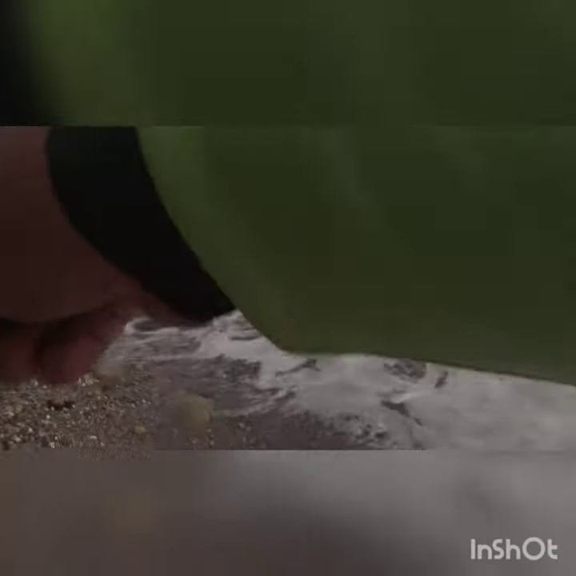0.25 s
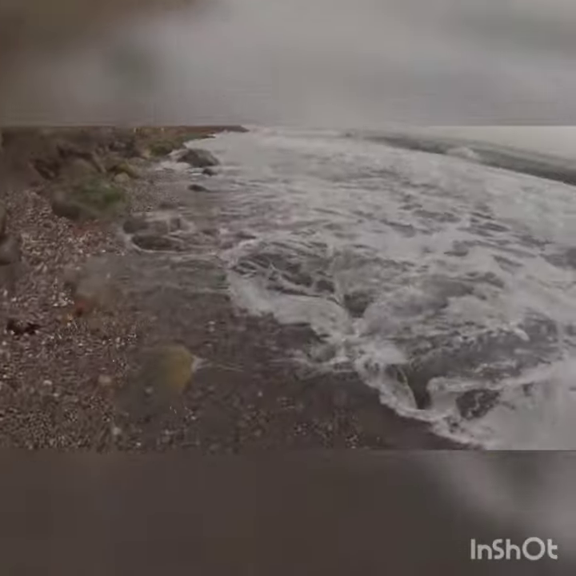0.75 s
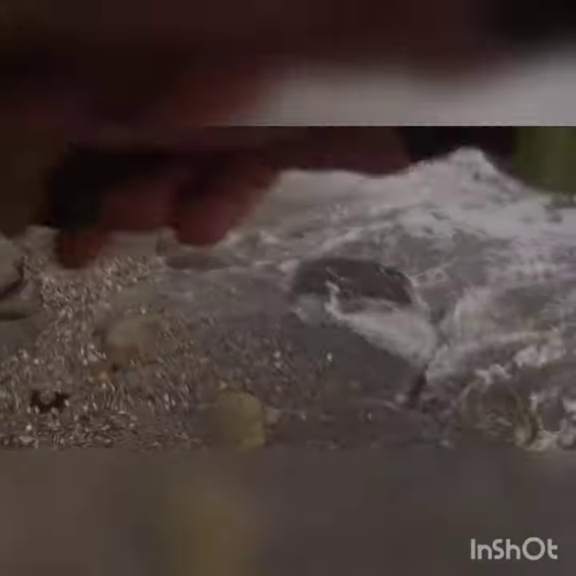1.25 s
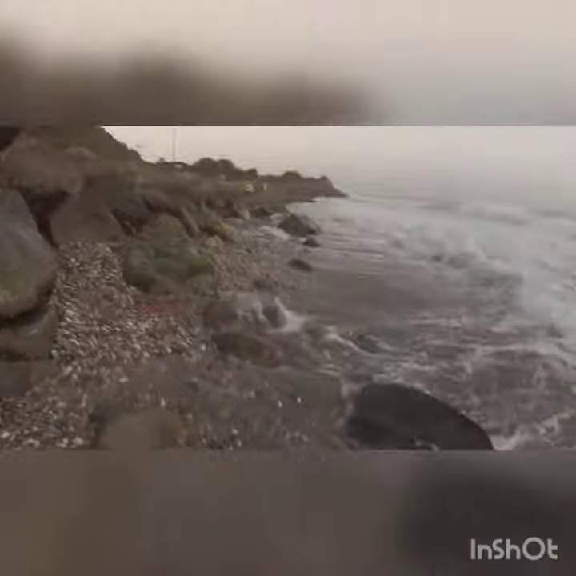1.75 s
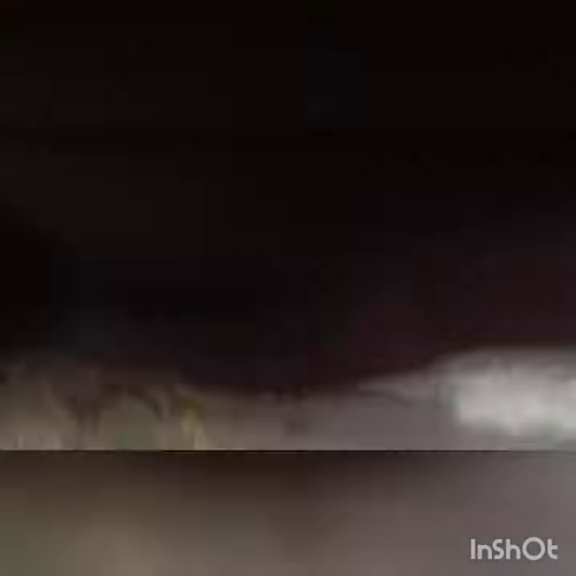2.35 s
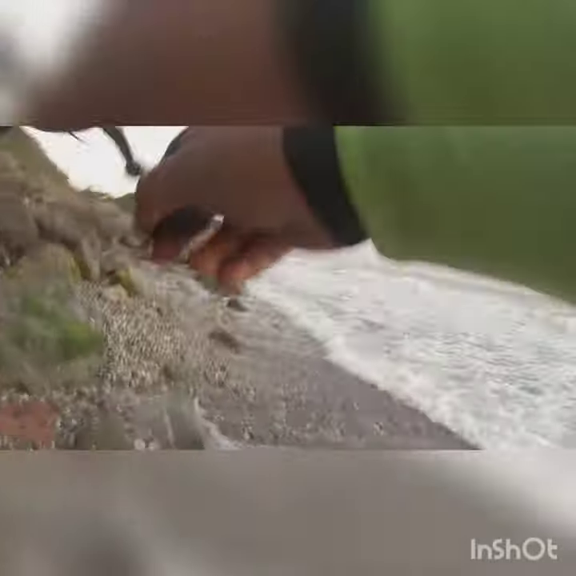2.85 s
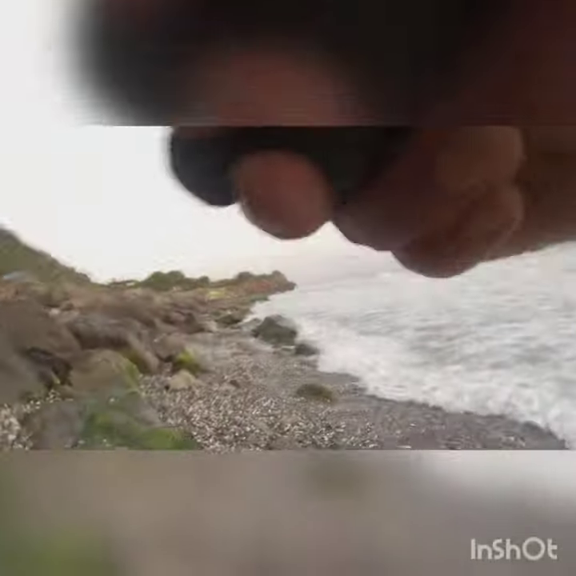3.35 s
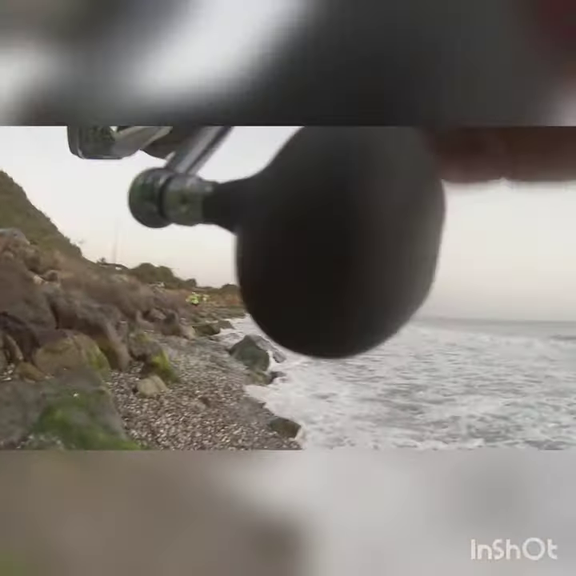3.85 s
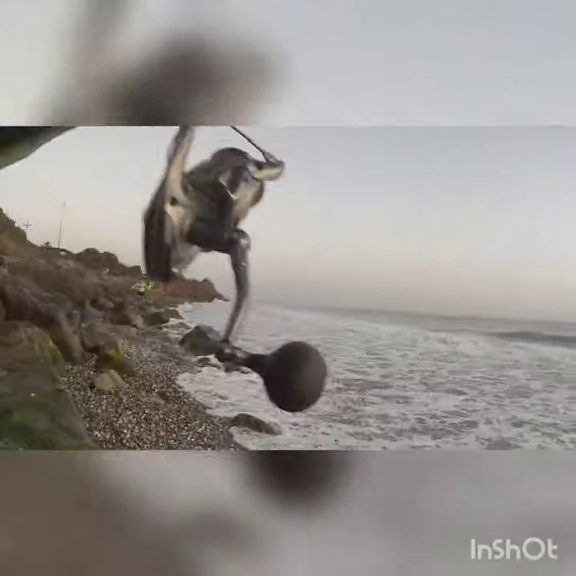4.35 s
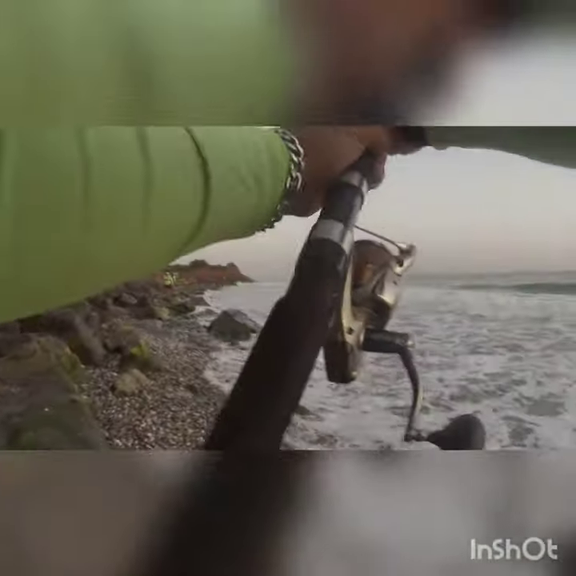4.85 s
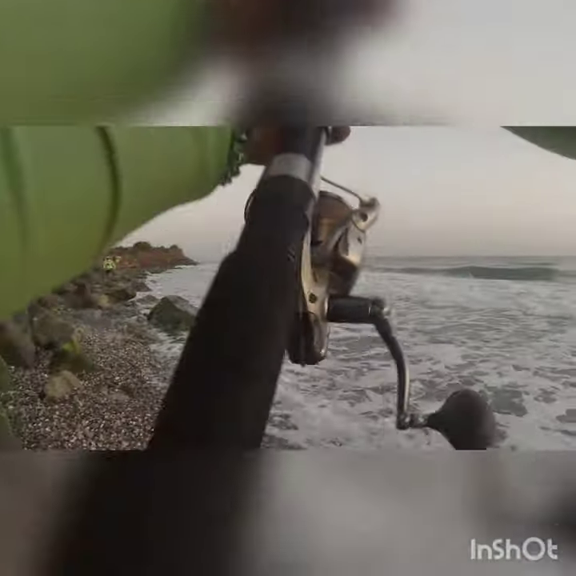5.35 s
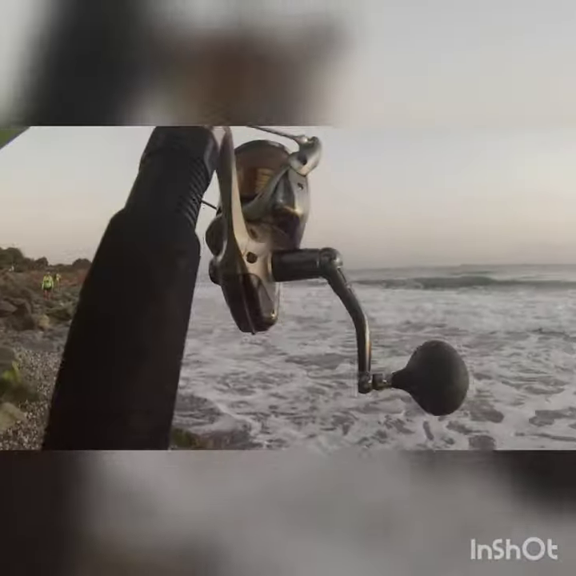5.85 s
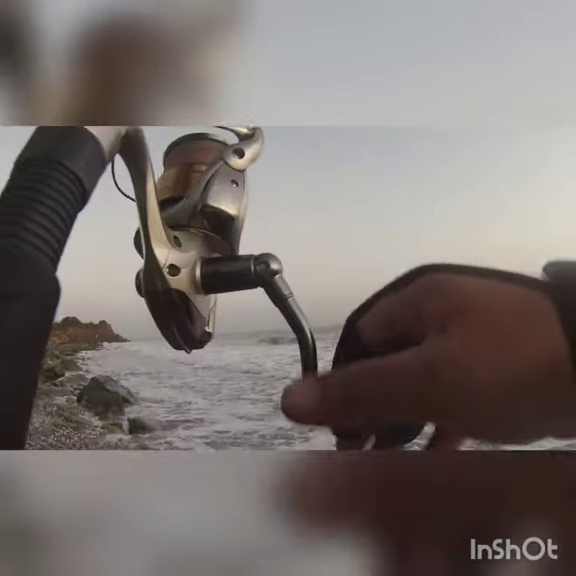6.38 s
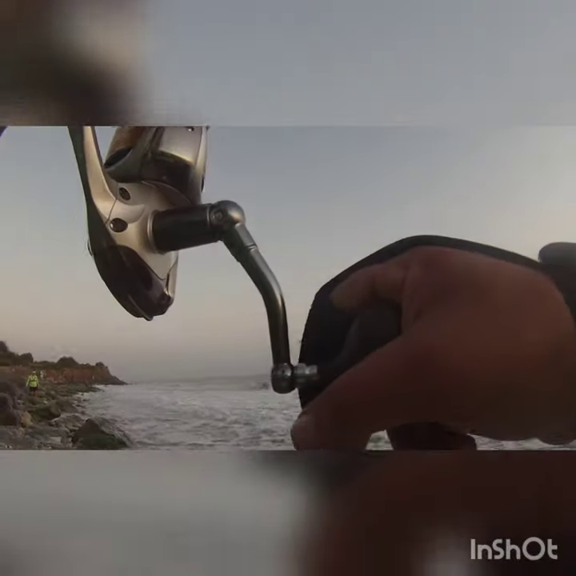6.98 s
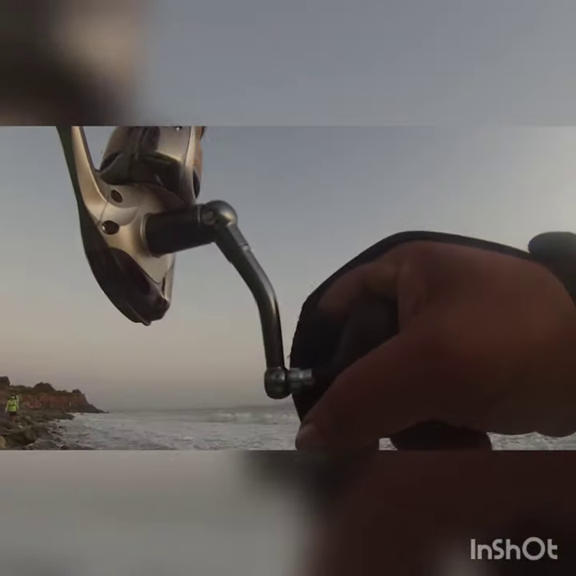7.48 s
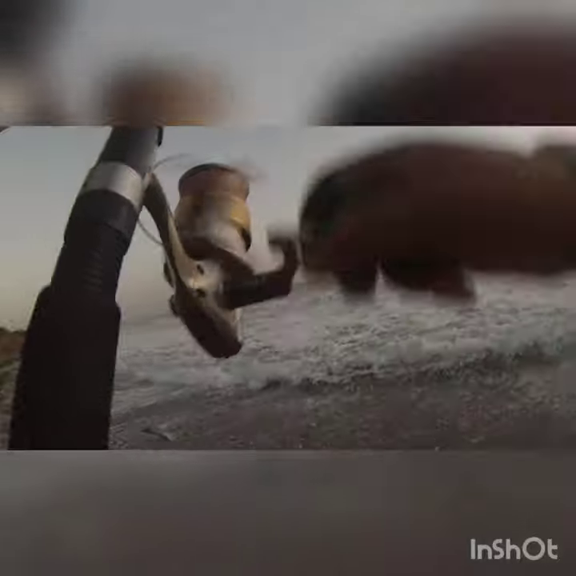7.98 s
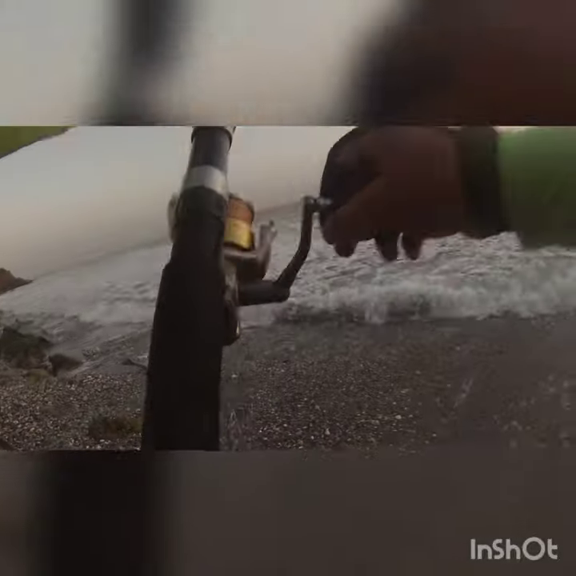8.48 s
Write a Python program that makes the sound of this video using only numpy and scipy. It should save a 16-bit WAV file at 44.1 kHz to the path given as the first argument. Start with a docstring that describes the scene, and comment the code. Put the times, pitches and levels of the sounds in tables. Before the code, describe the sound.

Close, hissing sea waves rush over shingle and recede while a worn camera is brushed, knocked sharply once, and lightly clicked by fishing tackle.

```python
"""Surf washes up a pebble beach and drains back through shingle, as filtered noise and grains driven by one surge.
A camera worn by an angler is brushed and bumped: noise strokes and damped modes. At 2.35 s the rod knocks its case
hard, as modes and a noise crack; the gain ducks and creeps back. Tackle ticks, as short rings, from 3.76 s.
From 6.3 to 8.05 s a hand's echo combs the sea, which surges most at 8.3 s. Wind rumbles throughout, as low noise."""
import sys
import numpy as np
from scipy import signal
from scipy.fft import rfft, irfft, next_fast_len
from scipy.io import wavfile
from scipy.ndimage import uniform_filter1d, map_coordinates

SR = 44100
rng = np.random.default_rng(int(sys.argv[2]) if len(sys.argv) > 2 else 0)


def bounce(signal):
    """Save signal as a 16-bit WAV file at the path given by the first command-line argument."""
    frames = np.transpose(np.atleast_2d(signal))
    limited = np.clip(frames, -1, 1)
    pcm = np.round(limited * 32767).astype(np.int16)
    wavfile.write(sys.argv[1], SR, pcm)


N = 384552  # samples, 8.72 s
TOP_HZ = 15300  # band limit of the camera

# modes of the reel's metal parts: pitch_hz, level_db, t60_s
REEL_MODES = [(1480, -16, .012), (2510, -5, 0.041), (3330, 4, 0.0099), (4740, -5, 0.019),
              (5460, -1, 0.0079), (6800, -11, 0.0055), (9750, -23, 0.0037)]


def surf():
    """Stochastic sources under one envelope: each band of the sea grows at its own rate with the surge."""
    # how hard the water runs up the shore, over the lull between waves: time_s, surge_db
    surge_points = [(0, 4.5), (0.22, 5), (0.55, 2), (1.1, 4.4), (1.3, 8), (1.7, 4), (2.28, 9.5),
                    (3.25, 4.5), (3.55, 3), (4.3, 1.7), (4.75, 0.1), (5.0, 3.5), (5.25, -0.8), (5.6, 2.4),
                    (6.3, 1.0), (7.2, 1.6), (8.3, 11), (8.72, 9)]
    # spectra of the four voices: frequency_hz, density_db (per Hz)
    roar_spectrum = [(50, -7), (120, -0.5), (200, 0), (330, 2), (480, -1.5), (700, -7), (1100, -11),
                     (2500, -33)]
    wash_spectrum = [(350, -43), (700, -12.5), (1050, -3.5), (1500, 2), (1900, 2), (2600, -3.5),
                     (4500, -34), (10000, -50)]
    shingle_spectrum = [(900, -7), (1700, -3), (2400, -3.5), (3200, -1.5), (4100, -3.5), (5500, -12),
                        (7000, -27.5), (11000, -32)]
    fizz_spectrum = [(3000, -35), (6000, 3.5), (8500, 3.5), (10500, -2.5), (12000, -7.5), (13700, -16),
                     (15200, -11)]
    # waves tumble over: peak_s, length_s, level_db
    breakers = [(1.0, 0.27, -52.5), (1.35, 0.37, -54), (2.1, 0.6, -55), (3.4, .6, -56.5), (4.25, 0.43, -59),
                (5.05, 0.56, -59), (8.35, 0.38, -56)]
    # backwash drags the pebbles down the slope: peak_s, length_s, level_db
    backwash = [(.43, 0.15, -54.5), (.75, 0.7, -52), (1.9, .65, -47), (3.05, .45, -53.5), (5.75, 0.24, -67),
                (7.75, 1.17, -55.5)]
    # foam bursts and drains close by: peak_s, length_s, level_db
    foam = [(.55, 0.88, -62), (1.75, 0.77, -62), (3.25, 0.41, -66.5), (7.6, 1, -69), (8.65, 0.29, -70)]

    surge_db = curves(surge_points)[0] + 0.5 * wobble(rate_hz=12)
    bubbles = grains(count=5000, pitch_hz=1267, spread=0.397, cycles=3.3, scatter_db=0)
    pebbles = grains(count=9000, pitch_hz=3660, spread=0.553, cycles=2.2, scatter_db=2.0)

    roar = coloured(rush(patchy_db=0.9), roar_spectrum)
    wash = coloured(rush(patchy_db=0.7) + 0.29 * bubbles, wash_spectrum)
    shingle = coloured(rush(patchy_db=1.16) + 0.36 * pebbles, shingle_spectrum)
    fizz = coloured(rng.standard_normal(N) + 0.49 * pebbles, fizz_spectrum)

    # growth is in dB gained per dB of surge
    roar *= voice_gain(surge_db, lull_db=-57.5, growth=0.25, extra_power=swells(breakers))
    wash *= voice_gain(surge_db, lull_db=-59, growth=1.045)
    shingle *= voice_gain(surge_db, lull_db=-58.5, growth=0.91, extra_power=swells(backwash))
    fizz *= voice_gain(surge_db, lull_db=-70, growth=0.52, extra_power=swells(foam))
    return roar + wash + shingle + fizz


def voice_gain(surge_db, lull_db, growth, extra_power=0):
    """Power addition of incoherent sources: a voice follows the surge, with its own swells on top."""
    return np.sqrt(amp(lull_db + growth * surge_db) ** 2 + extra_power)


def knock():
    """Impact excitation: a short noise crack, the shell's damped modes and a dying chatter of the rod."""
    # the rod strikes the case, bounces and settles: start_s, level_db, hardness_hz (cut-off)
    contacts = [(2.3516, -1, 15000), (2.3537, -28, 5000), (2.3606, -14.5, 3000), (2.454, -20.5, 900)]
    # modes of the plastic shell: pitch_hz, level_db, t60_s
    shell_modes = [(1010, -19, 0.016), (1103, -1, 0.018), (1336, -0.5, 0.014), (1520, -4, 0.032),
                   (1810, -6.5, 0.024), (2550, -4.5, 0.014), (3120, -7, 0.01), (4530, -14.5, 0.019),
                   (5600, -20, 0.0095), (6250, -16, 0.011), (7770, -21, .009), (11100, -20, 0.0046),
                   (14520, -23, .005)]
    # spectrum of the crack: frequency_hz, density_db (per Hz)
    crack_spectrum = [(200, -5), (600, 0), (1100, -10), (2500, 7), (4500, 4), (6500, -4), (9000, -23),
                      (15000, -17)]

    out, t = np.zeros(N), np.arange(SR // 10) / SR
    # the small shell radiates little bass
    shell = signal.lfilter(*signal.butter(2, 850, "high", fs=SR), ring(shell_modes, t))
    for start_s, level_db, hardness_hz in contacts:
        crack = coloured(rng.standard_normal(len(t)), crack_spectrum) * np.exp(-t / 0.0019)
        rattle = signal.fftconvolve(rng.standard_normal(len(t)), shell)[:len(t)]
        chatter = unit(rattle) * np.exp(-t / 0.02)
        blow = softened(0.53 * shell + 0.22 * crack + 0.096 * chatter, hardness_hz)
        add(out, start_s, amp(level_db) * blow)
    return out


def bumps():
    """Contact time limits bandwidth: soft blows that rock the camera reach only the mount's low modes."""
    # soft bumps on the mount: start_s, peak_db, hardness_hz (cut-off)
    contacts = [(1.014, -31, 400), (1.274, -41, 300), (1.307, -32, 250), (1.346, -25.5, 500),
                (2.3492, -23.5, 150), (2.3524, -7.5, 320), (2.367, -14, 700), (2.385, -17, 450),
                (2.403, -7, 128), (2.422, -12, 110), (2.455, -12.5, 800), (2.47, -22, 400),
                (2.551, -28, 160), (3.347, -34, 150), (3.392, -35.5, 150), (4.897, -44, 150),
                (5.68, -43, 213), (6.21, -43, 200), (7.926, -33, 45)]
    # modes of the mount: pitch_hz, level_db, t60_s
    mount_modes = [(30, -1.5, 0.15), (56, -18, 0.092), (89, -2.5, 0.1), (123, -4, 0.077), (246, -1, 0.028),
                   (384, -12, 0.028), (570, -5.5, .022)]

    out, t = np.zeros(N), np.arange(SR // 3) / SR
    for start_s, peak_db, hardness_hz in contacts:
        thud = softened(ring(mount_modes, t), hardness_hz)
        add(out, start_s, amp(peak_db) * thud / np.abs(thud).max())
    return out


def rubs():
    """Friction noise: each stroke is a run of tiny slips that swells fast and fades; some ring the reel."""
    # sleeve and hand brush the tackle: start_s, length_s, level_db, reel_share (of power, 0-1)
    strokes = [(0.155, 0.075, -51, 0.02), (1.214, 0.02, -44, 0), (1.23, 0.17, -50.5, 0.44),
               (2.348, 0.028, -30.5, 0.5), (2.373, 0.058, -39, 0.03), (2.399, 0.025, -29, 0.66),
               (2.757, 0.036, -46.5, 0), (3.26, 0.037, -48.5, 0.4), (3.759, 0.02, -49, 0.4),
               (3.774, 0.12, -50, 0.5), (4.258, 0.34, -55.5, 0), (4.466, 0.073, -55, 0.9)]
    # spectrum of rubbed cloth: frequency_hz, density_db (per Hz)
    cloth_spectrum = [(200, -16), (700, -11), (1500, 2), (3200, 7.5), (5500, -4.5), (8000, -6.5),
                      (15000, -18)]

    out = np.zeros(N)
    slips = rng.standard_normal(N) * amp(2.1 * wobble(rate_hz=600))
    cloth = coloured(slips, cloth_spectrum)
    reel_ring = ring(REEL_MODES, np.arange(SR // 20) / SR)
    metal = unit(signal.fftconvolve(slips, reel_ring)[:N])
    for start_s, length_s, level_db, reel_share in strokes:
        first = round(start_s * SR)
        span = slice(first, first + int(length_s * SR))
        stroke = np.sqrt(1 - reel_share) * cloth[span] + np.sqrt(reel_share) * metal[span]
        # the square root brings the peak forward
        pressure = np.sin(np.pi * np.sqrt(np.linspace(0, 1, len(stroke))))
        add(out, start_s, amp(level_db) * pressure * stroke)
    return out


def ticks():
    """Impulse response of coupled resonators: each small part rings briefly and also excites the reel."""
    # clicks of the reel and tackle: start_s, level_db, pitch_hz, reel_gain
    clicks = [(3.764, -39, 2420, .5), (3.791, -31.5, 1600, 0.33), (4.485, -39, 2370, .1),
              (4.4932, -46, 4930, .5), (4.594, -40, 3440, 0.58), (4.846, -51, 4600, .3),
              (5.546, -53, 5540, 0.35), (5.6295, -37, 1360, .02)]

    out, t = np.zeros(N), np.arange(SR // 20) / SR
    reel_ring = ring(REEL_MODES, t)
    for start_s, level_db, pitch_hz, reel_gain in clicks:
        part = np.exp(-t / 0.0032) * np.sin(2 * np.pi * pitch_hz * t)
        add(out, start_s, amp(level_db) * (part + reel_gain * reel_ring))
    return out


def wind():
    """Turbulent pressure on the case: a lumpy rumble, whose deepest part grows as the square of the gust."""
    # puffs of wind on the case: peak_s, length_s, level_db (before the rumble's own gains)
    gusts = [(.25, 0.15, -53), (.8, 0.26, -56.5), (1.33, 0.12, -47), (1.87, 0.15, -51.5), (2.28, 0.13, -51),
             (2.52, 0.13, -43.5), (2.97, 0.29, -53.5), (3.38, .1, -51), (3.9, 0.16, -57), (4.27, .2, -57),
             (4.98, 0.17, -53), (7.92, 0.31, -58)]
    # spectrum of the rumble: frequency_hz, density_db (per Hz)
    rumble_spectrum = [(10, 0.5), (28, -2.5), (50, -17.5), (75, -14.5), (110, -8.5), (160, -22.5),
                       (300, -28), (900, -64)]

    breeze_power = amp(-63) ** 2  # the air between gusts, on the scale of the gusts
    gust = np.sqrt(breeze_power + swells(gusts)) * amp(1.0 * wobble(rate_hz=8.2))
    rumble = coloured(rush(patchy_db=1.4), rumble_spectrum)
    deep = unit(softened(rush(patchy_db=5.0), cut_hz=45))
    return gust * (2.35 * rumble + 2.5 * deep * gust / gust.max())


def past_hand(x):
    """Comb filtering by a short echo: so small a surface returns only treble, and skin dulls the very top."""
    # the hand on the crank reflects the surf: time_s, echo_gain
    hand_points = [(6.3, 0), (6.9, 0.4), (7.7, 0.5), (8.05, 0)]
    delay_s, low_hz, high_hz = 0.000357, 4800, 9000

    def echo_response(hz):
        """Diffraction and absorption set the echo's band; a linear phase delays it."""
        small_surface = 1 - 1 / (1 + (hz / low_hz) ** 6)
        skin = 1 / (1 + (hz / high_hz) ** 8)
        return small_surface * skin * np.exp(-2j * np.pi * hz * delay_s)

    echo_gain, = curves(hand_points)
    return x + echo_gain * filtered(x, echo_response)


def through_case(x):
    """Cavity resonance: airborne sound takes on the peaks and notches of the hollow case."""
    # peaks and notches of the camera case: centre_hz, width_hz, gain_db
    resonances = [(1440, 300, 1), (2064, 310, -5), (2420, 87, 4.5), (2884, 130, 6), (3370, 530, 4),
                  (4130, 570, -5), (4690, 200, 6), (4920, 290, -5), (5630, 410, 4.5), (6100, 250, -3.5),
                  (6230, 220, 3), (7650, 570, -2), (11500, 900, 3), (14600, 800, -2.5)]
    for centre_hz, width_hz, gain_db in resonances:
        sharpness = centre_hz / width_hz * amp(gain_db / 2)
        band = signal.lfilter(*signal.iirpeak(centre_hz, sharpness, fs=SR), x)
        x = x + (amp(gain_db) - 1) * band
    return x


def gain_control(x):
    """Dynamic range compression: a loud sound turns the gain down fast; it recovers at a steady dB rate."""
    threshold_db, attack_s, recover_db_per_s = -20.5, 0.028, 13.5
    power = np.abs(uniform_filter1d(x ** 2, size=SR // 100))  # mean over 10 ms
    level_db = 10 * np.log10(power + 1e-12)
    recovery_db = recover_db_per_s * np.arange(N) / SR
    excess_db = np.maximum(level_db - threshold_db, 0)
    # hold the largest cut so far, less what has been recovered since
    cut_db = np.maximum.accumulate(excess_db + recovery_db) - recovery_db
    keep = np.exp(-1 / (attack_s * SR))
    return x * amp(-signal.lfilter([1 - keep], [1, -keep], cut_db))


def rush(patchy_db):
    """Modulated noise: its strength drifts in patches of time and frequency."""
    bins = signal.stft(rng.standard_normal(N), nperseg=512)[2]
    field = uniform_filter1d(rng.standard_normal(bins.shape), size=7, axis=0)
    field = uniform_filter1d(field, size=12, axis=1)
    patchy = bins * amp(patchy_db * unit(field))
    return unit(signal.istft(patchy, nperseg=512)[1][:N])


def grains(count, pitch_hz, spread, cycles, scatter_db):
    """Superposition of many tiny damped oscillators of random time, pitch and size."""
    t = np.arange(SR // 200) / SR  # 5 ms each
    start = rng.integers(0, N, (count, 1))
    hz = np.minimum(pitch_hz * np.exp(spread * rng.standard_normal((count, 1))), TOP_HZ)
    size = amp(scatter_db * np.minimum(rng.exponential(size=(count, 1)), 5))
    rings = size * np.exp(-hz * t / cycles) * np.sin(2 * np.pi * hz * t)
    index = start + np.arange(len(t))
    return unit(np.bincount(index.ravel(), rings.ravel(), N)[:N])


def swells(rows):
    """Power addition of events that grow to a peak and ebb away; the length is taken at half power."""
    t, rise = np.arange(N) / SR, 0.52  # share of the length spent growing
    power = np.zeros(N)
    for peak_s, length_s, level_db in rows:
        half_s = length_s * np.where(t < peak_s, rise, 1 - rise)
        power += amp(level_db) ** 2 * 0.5 ** (((t - peak_s) / half_s) ** 2)
    return power


def ring(modes, t):
    """Modal superposition: damped sines after one blow."""
    return sum(amp(db - 60 * t / t60) * np.sin(2 * np.pi * hz * t) for hz, db, t60 in modes)


def softened(x, cut_hz):
    """Low-pass filtering: a softer contact loses its treble."""
    return signal.lfilter(*signal.butter(2, min(cut_hz, TOP_HZ), fs=SR), x)


def coloured(x, spectrum):
    """Spectral shaping by levels joined on a log frequency axis, at rms 1."""
    f, db = np.transpose(spectrum)
    return unit(filtered(x, lambda hz: amp(np.interp(np.log(hz + 1), np.log(f), db))))


def filtered(x, response):
    """Linear filtering: the spectrum of x times a response of frequency."""
    m = next_fast_len(len(x) + SR // 4)  # padded against wrap-around
    return irfft(rfft(x, m) * response(np.fft.rfftfreq(m, 1 / SR)), m)[:len(x)]


def wobble(rate_hz):
    """Band-limited random modulation: a smooth curve through rate_hz random knots a second."""
    knots = rng.standard_normal(int(N * rate_hz / SR) + 4)
    return map_coordinates(knots, [np.arange(N) * rate_hz / SR])


def curves(rows):
    """Linear interpolation: one value per sample for each column after the time."""
    time_s, *columns = np.transpose(rows)
    return [np.interp(np.arange(N) / SR, time_s, column) for column in columns]


def add(track, start_s, sound):
    """Linear superposition: mix a sound into the track at its start."""
    part = track[round(start_s * SR):][:len(sound)]
    part += sound[:len(part)]


def amp(db):
    """Logarithmic level: decibels to amplitude gain."""
    return 10 ** (np.asarray(db) / 20)


def unit(x):
    """Mean-power normalisation: scale to rms 1."""
    return x / np.sqrt(np.mean(x ** 2) + 1e-20)


def scene():
    """Superposition: sea coloured by hand and case, the angler's handling close by, and wind."""
    sea = through_case(past_hand(surf()))
    handling = knock() + bumps() + rubs() + ticks()
    return (sea + handling + wind())[None]


def record(dry):
    """Compression, saturation and band limiting: the camera ducks, overloads softly and cuts the top."""
    x = gain_control(dry[0])
    x = x / (1 + x ** 6) ** (1 / 6)
    return filtered(x, lambda hz: hz < TOP_HZ)[None]


dry = scene()
out = record(dry)
bounce(out)
```